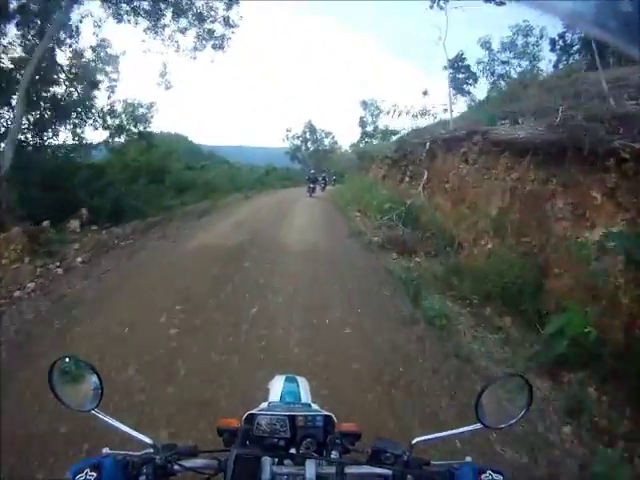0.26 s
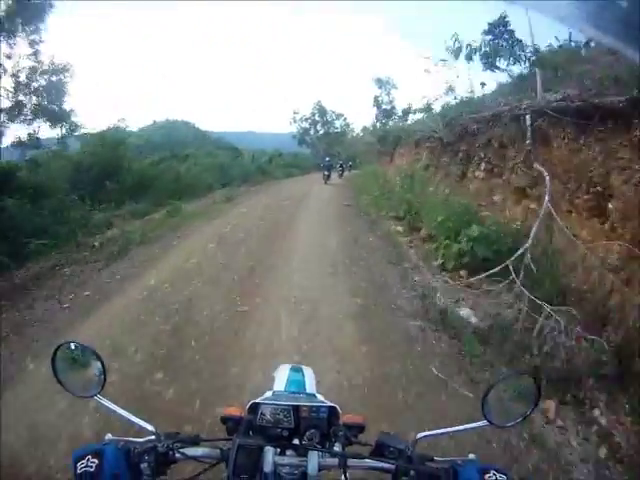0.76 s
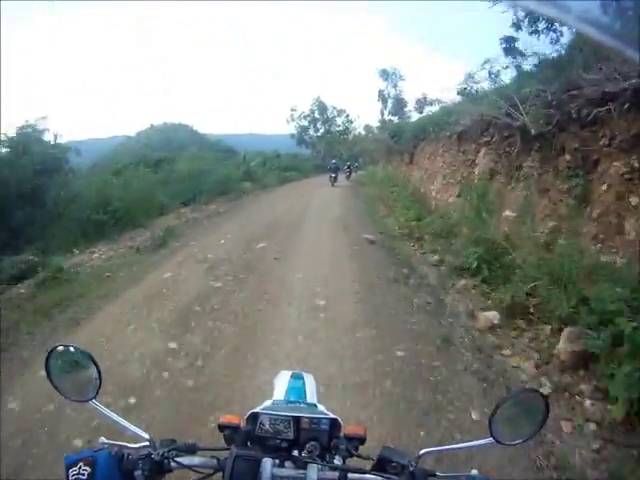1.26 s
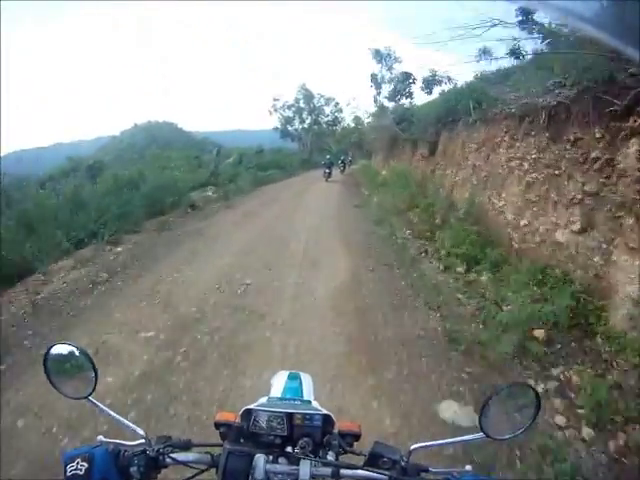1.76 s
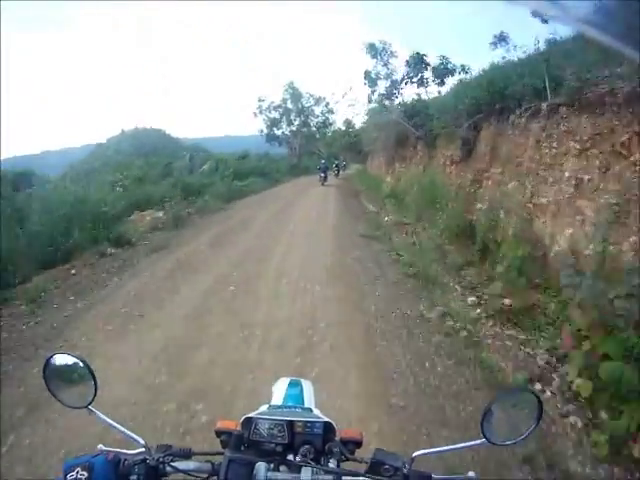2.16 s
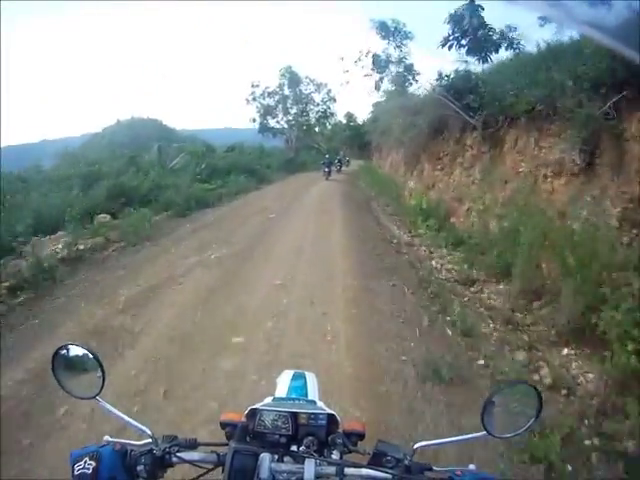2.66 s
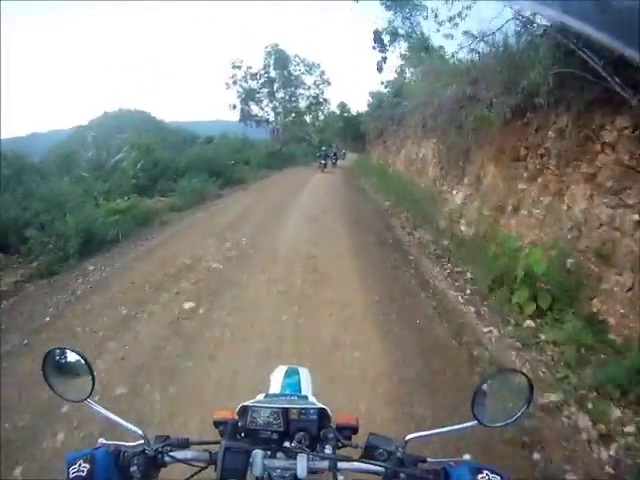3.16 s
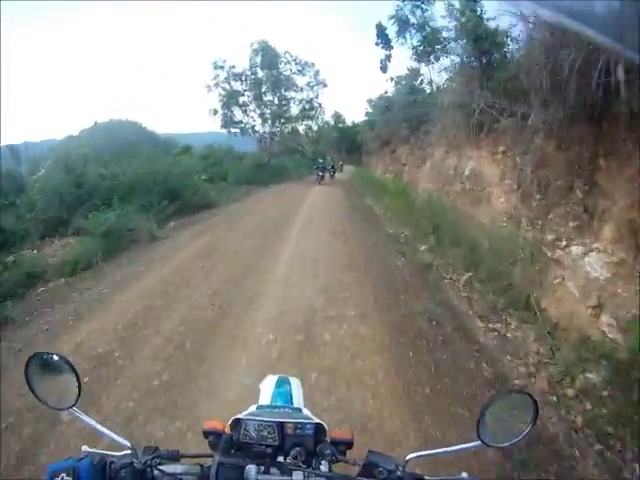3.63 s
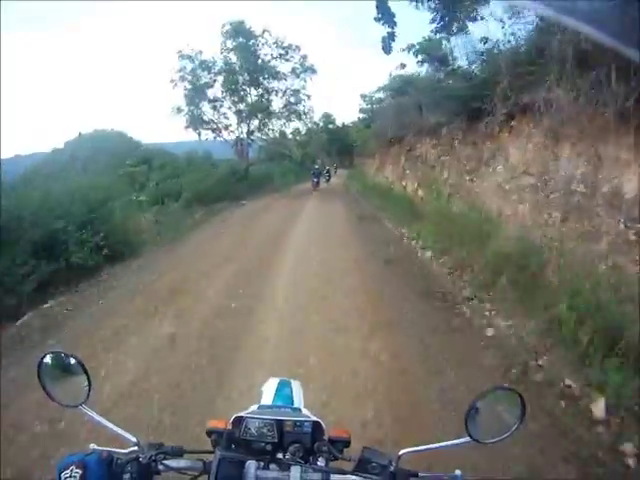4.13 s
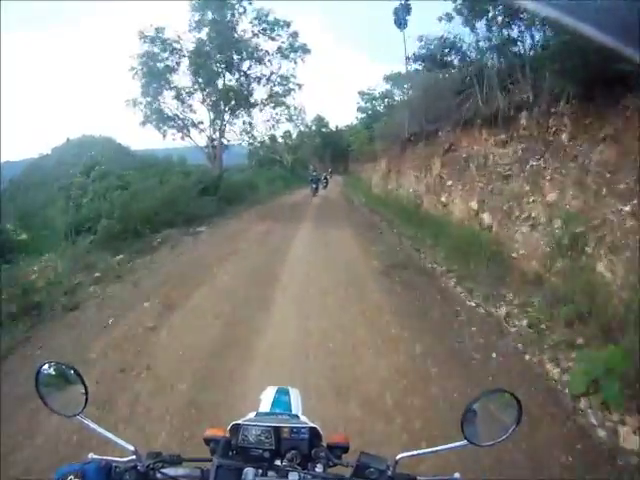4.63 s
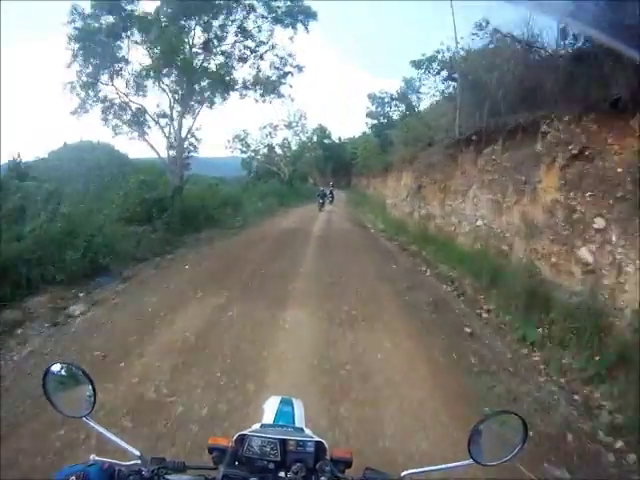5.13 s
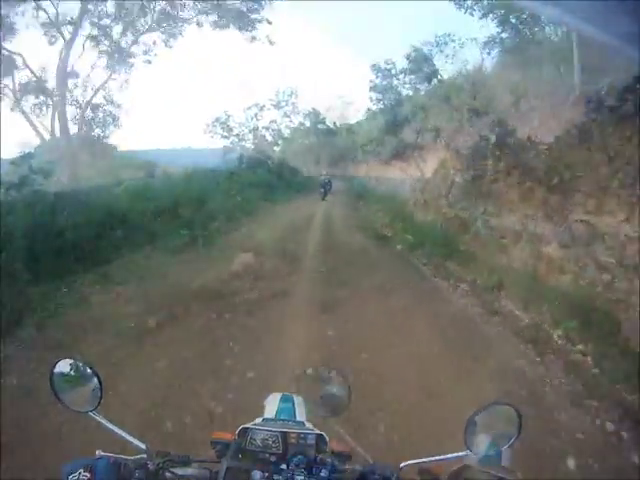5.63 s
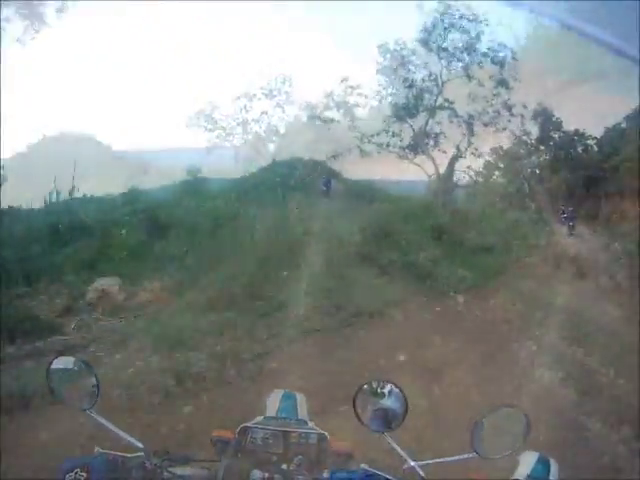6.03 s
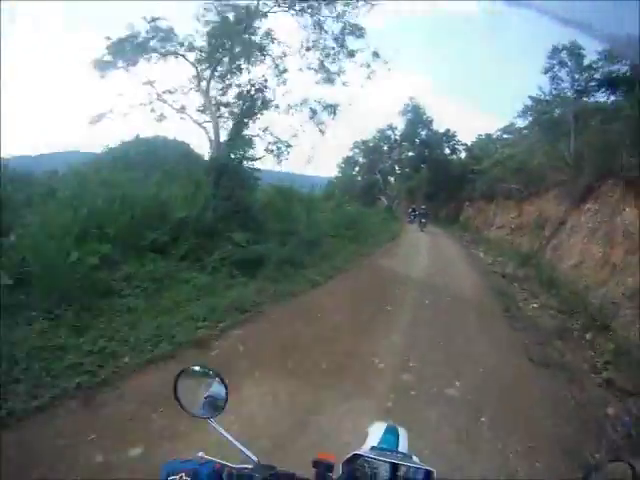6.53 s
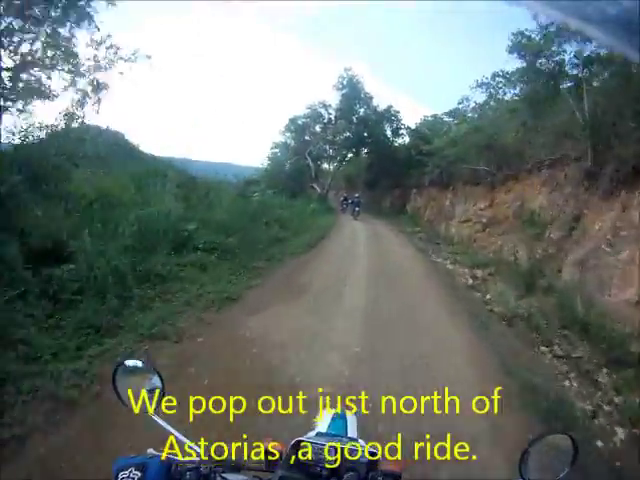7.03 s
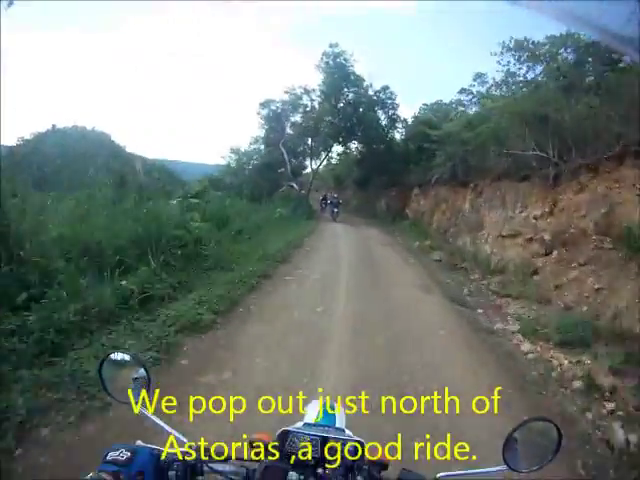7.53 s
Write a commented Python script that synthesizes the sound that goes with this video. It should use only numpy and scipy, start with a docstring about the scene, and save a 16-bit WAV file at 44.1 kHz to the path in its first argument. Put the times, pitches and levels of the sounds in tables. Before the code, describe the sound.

A single-cylinder trail motorbike thumps along a gravel road, heard close up from the rider's helmet. The deep engine beat holds steady, with occasional harder bangs, while wind rushes past with a faint whistle and the tyres crunch softly. A rut gives a short, dull knock near the middle. Later the wind buffets in gusts and the engine blends into a slightly faster beat.

```python
"""A single-cylinder trail motorbike thumps along a gravel road, heard from the rider's helmet.
Firings boom in the silencer and bark in the pipe; valves clatter, tyres crunch, bright ticks snap.
Wind rushes, buffets and whistles at the helmet. One stretch overlaps a slightly faster one.
Hard firings duck the camera's gain control, and its coarse sampling adds a fizz."""
import sys
import numpy as np
from scipy import signal
from scipy.fft import rfft, irfft, next_fast_len
from scipy.io import wavfile
from scipy.ndimage import uniform_filter1d, map_coordinates

SR = 44100
rng = np.random.default_rng(int(sys.argv[2]) if len(sys.argv) > 2 else 0)


def bounce(signal):
    """Save signal as a 16-bit WAV file at the path given by the first command-line argument."""
    frames = np.transpose(np.atleast_2d(signal))
    limited = np.clip(frames, -1, 1)
    pcm = np.round(limited * 32767).astype(np.int16)
    wavfile.write(sys.argv[1], SR, pcm)


N = 343098
TIME = np.arange(N) / SR
# spectrum of gravel and valve noise: (frequency [Hz], level [dB])
GRIT_SPECTRUM = [(600, 1.5), (1300, -5), (1800, -0.5), (2200, 4.5), (2450, -1), (2800, -1), (3200, -9.5),
                 (3950, -9), (4300, -13), (4800, -15.5), (5500, -26), (6000, -50)]


def engine(speed, silencer_modes, offset_cycles, level_db, bark_db, puff_db, clatter_db):
    """Each firing booms in the silencer, barks in the pipe and puffs gas; valves ring the head."""
    # accented firings: (time [s], extra force [dB])
    bangs = [(.02, 6), (.16, 9.5), (.39, 6.5), (.67, 6.5), (1.38, -1), (1.48, 1), (1.52, 7), (2.31, 1),
             (2.68, 6), (3.0, 5.5), (3.59, 8.5), (3.72, 3.5), (3.85, 6), (3.99, 6.5), (4.16, 9.5),
             (4.6, 6.5), (4.74, 6.5), (5.13, 4.5), (6.03, 7), (6.94, 1), (7.02, 4), (7.1, 8.5), (7.31, 2.5),
             (7.39, 3), (7.52, 5.5), (7.69, 5)]
    # exhaust pipe resonances: (frequency [Hz], width [Hz], level [dB])
    pipe_modes = [(107, 52.7, 1.5), (137.6, 16.5, 4), (250.7, 50, -1), (324, 79, -8.5), (381, 84, -19.5),
                  (590, 47, -10.5)]
    # exhaust gas spectrum: (frequency [Hz], level [dB])
    puff_spectrum = [(60, -9), (130, 6.5), (185, -8.5), (270, 0.5), (350, -3.5), (480, -26), (620, -20.5),
                     (800, -19.5), (1500, -47), (3000, -58.5)]
    # cylinder head resonances: (frequency [Hz], width [Hz], level [dB])
    head_modes = [(2220, 180, 1.5), (2560, 140, 2), (2970, 290, -1.5), (3965, 81, 5.5)]
    firing_hz = curve(speed)
    cycle = np.cumsum(firing_hz) / SR - offset_cycles
    fired_s = np.interp(np.arange(int(cycle[-1]) + 1), cycle, TIME)
    burn, boom_jitter, bark_jitter, bark_scatter = rng.standard_normal((len(fired_s), 4)).T
    force_db = 1.5 * (burn - .29 * np.roll(burn, 1))  # the next burn partly makes up a weak one
    for time_s, extra_db in bangs:
        force_db[np.argmin(abs(fired_s - time_s))] += extra_db
    # a harder burn raises the bark more than the boom
    round_pulses = blasts(fired_s + .00095 * boom_jitter, amp(.43 * force_db), edge_hz=620)
    bark_sizes = amp(1.2 * force_db + 1.25 * bark_scatter)
    sharp_pulses = blasts(fired_s + .0012 + .00064 * bark_jitter, bark_sizes, edge_hz=1500)
    boom = resonate(round_pulses, silencer_modes)
    bark = amp(bark_db) * resonate(sharp_pulses, pipe_modes)
    exhaust_open = np.exp(1.47 * (np.cos(2 * np.pi * (cycle + .026)) - 1))
    gas_gain = amp(.59 * np.interp(TIME, fired_s, force_db))
    puff = amp(puff_db) * unit(noise(puff_spectrum) * exhaust_open * gas_gain)
    valve_contact = np.exp(1.8 * (np.cos(2 * np.pi * (cycle - .08)) - 1))
    clatter = amp(clatter_db) * resonate(noise(GRIT_SPECTRUM) * valve_contact, head_modes)
    throttle_db = 1.1 * uniform_filter1d(np.gradient(firing_hz, TIME), SR // 4)  # louder when pulling
    return amp(level_db + throttle_db) * (boom + bark + puff + clatter)


def blasts(times_s, sizes, edge_hz, radiate_hz=44):
    """Pressure pulses rounded by the valve's opening time; the narrow tailpipe cuts deep bass."""
    return filtered(pulses(times_s, sizes),
                    lambda hz: 1 / (1 + 1j * hz / edge_hz) ** 3 / (1 + (radiate_hz / (hz + 1)) ** 6))


def riding_noise(flow, width_hz, wind_db, road_db, whistle_db, cruise_hz=1100):
    """One airflow, in octaves of whistle pitch above cruise, drives wind, tyres and whistle."""
    flow_oct = np.log2(curve(flow) / cruise_hz)
    return (amp(wind_db) * wind(flow_oct) + amp(road_db) * tyres(flow_oct)
            + amp(whistle_db) * whistle(flow_oct, cruise_hz, width_hz))


def wind(flow_oct, db_per_oct=3.5):
    """Turbulent air tumbles past the helmet, louder as it flows faster."""
    # turbulence spectrum: (frequency [Hz], level [dB])
    spectrum = [(10, -34), (22, -10), (38, 10.5), (55, 0), (100, 4.5), (180, 0), (270, 3.5), (340, .5),
                (430, -3), (520, -1), (605, 2), (680, -7.5), (880, -9.5), (1200, -14.5), (1600, -26),
                (3000, -56.5)]
    return amp(db_per_oct * flow_oct + wobble(30)) * noise(spectrum)


def gusts(from_s, to_s):
    """Gusts centred within the span swell and fade, buffeting the helmet in lumps."""
    # gusts: (centre [s], length [s], level [dB])
    swells = [(4.095, .12, -24.5), (5.104, .1, -24.5), (5.401, 0.42, -20.5), (5.937, 0.68, -16),
              (6.422, .55, -17), (7.49, .1, -31), (7.663, .06, -23.5)]
    # buffeting spectrum: (frequency [Hz], level [dB])
    spectrum = [(70, -22), (170, -2.5), (260, 0), (480, -1.5), (620, -6), (900, -17), (1600, -23.5),
                (3000, -34), (6000, -62)]
    envelope = sum(amp(db) * np.cos(np.pi * np.clip((TIME - centre_s) / length_s, -.5, .5))
                   for centre_s, length_s, db in swells if from_s <= centre_s < to_s)
    return envelope * amp(2.7 * wobble(35)) * noise(spectrum)


def whistle(flow_oct, cruise_hz, width_hz, db_per_oct=8.5):
    """A breathy edge tone whose pitch and strength follow the airflow."""
    pitch_hz = cruise_hz * 2 ** flow_oct * (1 + .012 * wobble(25))
    phase = 2 * np.pi * np.cumsum(pitch_hz) / SR
    a, b = [filtered(rng.standard_normal(N), lambda hz: 1 / (1 + (hz / width_hz) ** 2))
            for _ in range(2)]
    return amp(db_per_oct * flow_oct) * unit(a * np.cos(phase) + b * np.sin(phase))


def tyres(flow_oct, db_per_oct=4.5, grains=3000):
    """Gravel crunches in dense grains over a smooth hiss; both swell with the airflow."""
    sizes = np.sign(rng.standard_normal(grains)) * amp(rng.uniform(-9, 0, grains))
    crunch = coloured(pulses(rng.uniform(0, N / SR, grains), sizes), GRIT_SPECTRUM)
    return amp(db_per_oct * flow_oct + .62 * wobble(40)) * (noise(GRIT_SPECTRUM) + amp(-3.5) * crunch)


def ruts():
    """Ruts jolt the bike with short, dead knocks."""
    # jolts: (time [s], level [dB])
    jolts = [(3.221, -11.5), (5.91, -20)]
    return hits(jolts, [(400, 230, 10.5), (850, 690, -7)], t60_s=.031, soft_hz=1200, gain_db=2.5)


def ticks():
    """Short bright ticks: flicked stones, and the sharp edge of a hard firing at .39 s."""
    # ticks: (time [s], level [dB])
    events = [(.392, -38), (1.18, -36), (3.195, -35), (3.885, -42), (4.565, -36.5), (5.26, -39),
              (6.716, -33.5)]
    return hits(events, [(2800, 1600, .073), (4600, 1300, .93)], t60_s=.02, soft_hz=10000, gain_db=-1)


def scrapes():
    """The tyres scuff loose gravel."""
    # scuffs: (time [s], level [dB])
    scuffs = [(1.098, -36), (1.192, -38), (5.08, -40.5), (7.085, -41.5)]
    return hits(scuffs, [(2330, 900, 1), (3740, 900, -6.5)], t60_s=.2, soft_hz=5000, gain_db=.5)


def hits(events, modes, t60_s, soft_hz, gain_db):
    """Bursts of force, dulled by a soft contact, drive damped resonances."""
    force = sum(amp(db - 60 * abs(TIME - s) / t60_s) * (TIME >= s) for s, db in events)
    burst = filtered(force * rng.standard_normal(N), lambda hz: 1 / (1 + 1j * hz / soft_hz) ** 3)
    return amp(gain_db) * np.sqrt(np.mean(force ** 2)) * resonate(burst, modes)


def gain_control(x, threshold_db, attack_s=.0043, recover_db_per_s=51):
    """A hard bang slips through, then ducks the level for a moment."""
    over_db = np.maximum(20 * np.log10(abs(x) + 1e-9) - threshold_db, 0)
    recovery_db = recover_db_per_s * TIME
    held_db = np.maximum.accumulate(over_db + recovery_db) - recovery_db
    pole = np.exp(-1 / (attack_s * SR))
    return x * amp(-signal.lfilter([1 - pole], [1, -pole], held_db))


def amp(db):
    """Decibels to gain."""
    return 10 ** (np.asarray(db) / 20)


def unit(x):
    """Scale to rms 1."""
    return x / np.sqrt(np.mean(x ** 2) + 1e-20)


def curve(points):
    """(time [s], value) points, interpolated per sample."""
    return np.interp(TIME, *np.transpose(points))


def fade(start_s, length_s):
    """Linear ramp from 0 to 1."""
    return np.clip((TIME - start_s) / length_s, 0, 1)


def wobble(knot_hz):
    """Smooth random curve."""
    return map_coordinates(rng.standard_normal(int(N * knot_hz / SR) + 4), [TIME * knot_hz])


def pulses(times_s, sizes):
    """One impulse at each time."""
    return np.bincount(np.clip(times_s * SR, 0, N - 1).astype(int), sizes, N)


def filtered(x, response):
    """Apply a complex frequency response."""
    size = next_fast_len(N + SR // 2)
    return irfft(rfft(x, size) * response(np.fft.rfftfreq(size, 1 / SR)), size)[:N]


def coloured(x, spectrum):
    """Shape x by (frequency [Hz], level [dB]) points on a log axis; rms 1."""
    points_hz, db = np.transpose(spectrum)
    return unit(filtered(x, lambda hz: amp(np.interp(np.log(hz + 1), np.log(points_hz), db))))


def noise(spectrum):
    """Coloured noise; rms 1."""
    return coloured(rng.standard_normal(N), spectrum)


def resonate(x, modes):
    """Ring (frequency [Hz], width [Hz], level [dB]) modes of alternating sign; rms 1."""
    def response(hz):
        return sum((-1) ** k * amp(db) * 1j * hz * width / (centre ** 2 - hz ** 2 + 1j * hz * width)
                   for k, (centre, width, db) in enumerate(modes))
    return unit(filtered(x, response))


def scene():
    """Two overlapping, gain-controlled stretches of engine, air and road; ticks and scrapes on top."""
    # engine speed per stretch: (time [s], firing rate [Hz])
    slow_speed = [(0, 21.63), (.7, 21.22), (1.6, 21.26), (2.4, 21.78), (3.1, 21.98), (3.9, 22.57),
                  (5, 22.82), (5.3, 23.15), (5.8, 23.2), (6.7, 23.93)]
    fast_speed = [(5.2, 24.03), (6, 24.24), (6.8, 24.52), (7.3, 24.11), (7.78, 23.65)]
    # silencer resonances: (frequency [Hz], width [Hz], level [dB])
    slow_silencer = [(64.23, 11.8, 1.5), (107.8, 57, -12)]
    fast_silencer = [(74.9, 26, 0.5), (110.6, 42.5, -5)]
    # airflow over the helmet: (time [s], whistle pitch [Hz])
    slow_flow = [(0, 1126), (.6, 1040), (1.0, 1181), (1.6, 957), (1.85, 1164), (2.15, 1012), (2.4, 1130),
                 (2.7, 1008), (2.95, 1164), (3.5, 1027), (3.85, 1019), (4.07, 1247), (4.18, 1144),
                 (4.3, 1265), (4.55, 1041), (5.0, 1032), (5.35, 1262), (5.8, 1089), (6.55, 1217)]
    fast_flow = [(5.2, 1180), (6.0, 1060), (6.5, 1178), (6.7, 1511), (7.0, 1340), (7.1, 1470), (7.17, 1390),
                 (7.29, 1473), (7.39, 1270), (7.5, 1432), (7.78, 1246)]
    fast_start_s = 5.17
    slow = engine(slow_speed, slow_silencer, offset_cycles=.376,
                  level_db=-15.5, bark_db=-10, puff_db=-10.5, clatter_db=-37.5)
    slow += riding_noise(slow_flow, width_hz=73, wind_db=-23, road_db=-41.5, whistle_db=-38.5)
    slow += gusts(0, fast_start_s) + ruts()
    fast = engine(fast_speed, fast_silencer, offset_cycles=.118,
                  level_db=-16, bark_db=-7.5, puff_db=-8, clatter_db=-37)
    fast += riding_noise(fast_flow, width_hz=45, wind_db=-24.5, road_db=-44, whistle_db=-40)
    fast += gusts(fast_start_s, N / SR)
    slow = gain_control(slow, threshold_db=-8) * (1 - fade(start_s=6.6, length_s=.38))
    fast = gain_control(fast, threshold_db=-7.5) * fade(fast_start_s, length_s=.054)
    mono = slow + fast + ticks() + scrapes()
    return np.array([mono, mono])


def record(dry, hold_hz=12000, top_hz=15300):
    """The mono camera rounds peaks and holds coarse samples, mirroring the sound into the treble."""
    # faint hiss, opposite in sign at each ear: (frequency [Hz], level [dB])
    hiss_spectrum = [(35, -31), (60, -2.5), (2840, -25), (6020, -26), (8480, -29.5), (10900, -42),
                     (14000, -49)]
    rounded = dry[0] / (1 + abs(dry[0] / .98) ** 8) ** (1 / 8)
    # sample and hold: differentiate, chop, integrate
    slope = filtered(rounded, lambda hz: 1j * hz * (hz < hold_hz / 2))
    steps = slope * (1 + 2 * np.cos(2 * np.pi * hold_hz * TIME))
    held = filtered(steps, lambda hz: (hz > 10) / (1j * np.maximum(hz, 1)))
    hiss = amp(-67) * noise(hiss_spectrum)
    return np.array([filtered(ear, lambda hz: hz < top_hz) for ear in (held + hiss, held - hiss)])


dry = scene()
out = record(dry)
bounce(out)
```